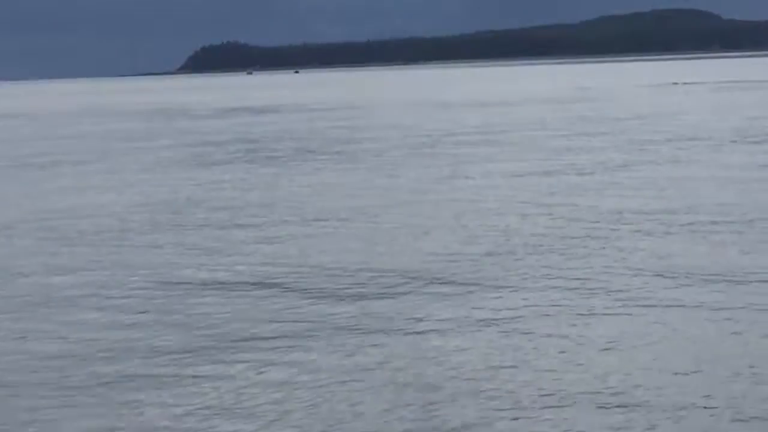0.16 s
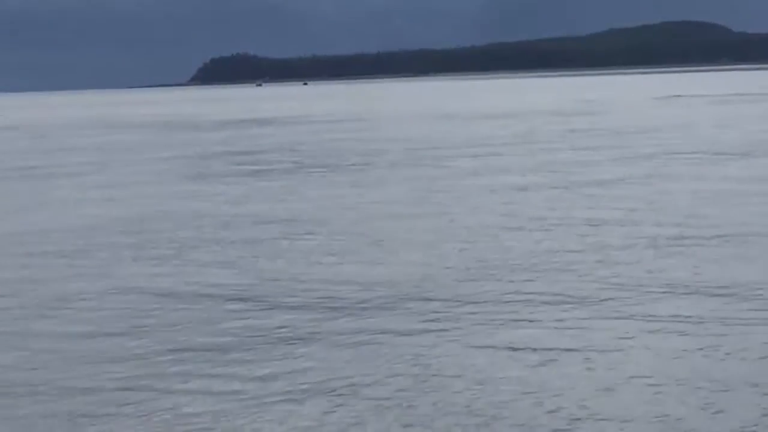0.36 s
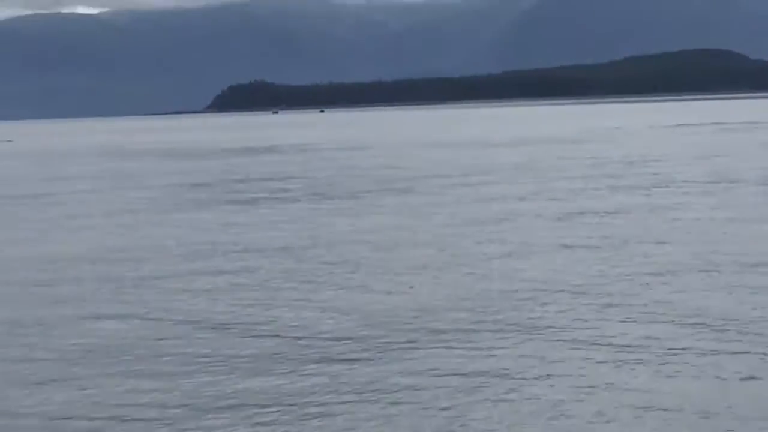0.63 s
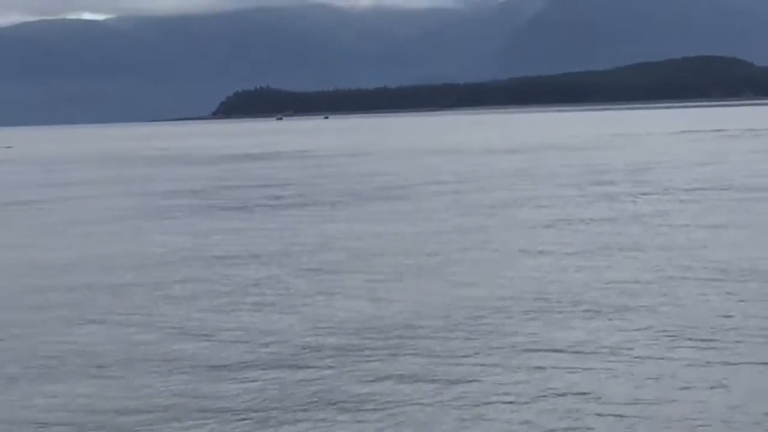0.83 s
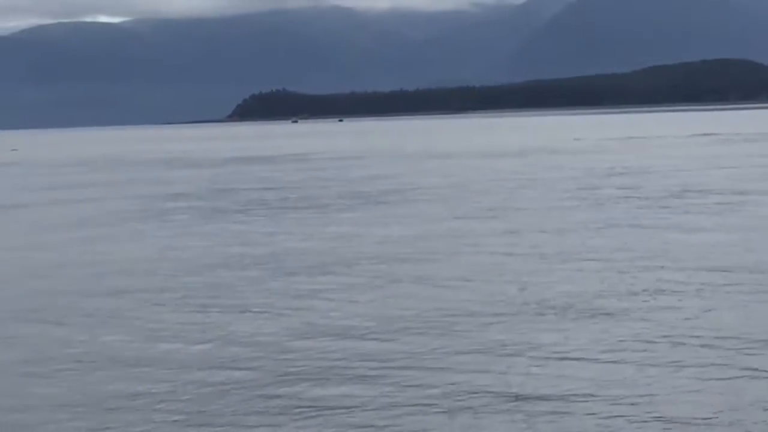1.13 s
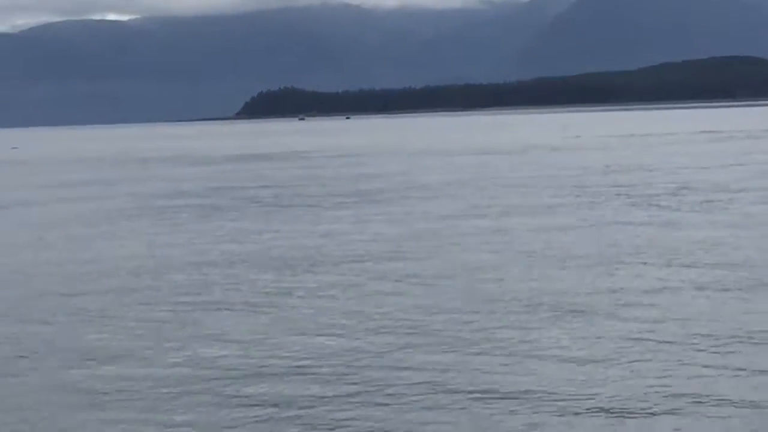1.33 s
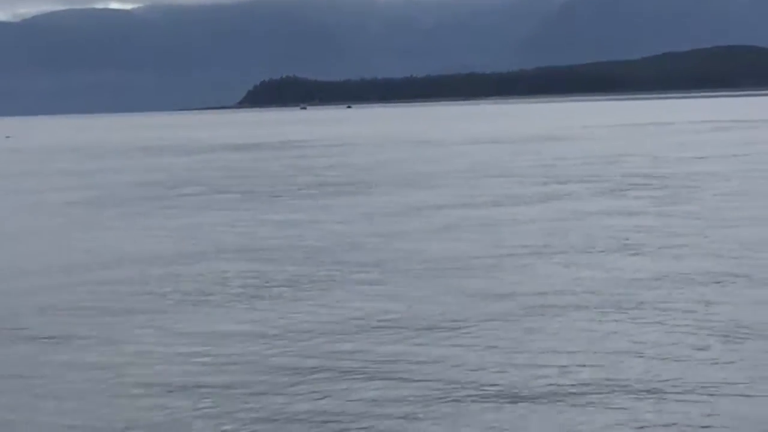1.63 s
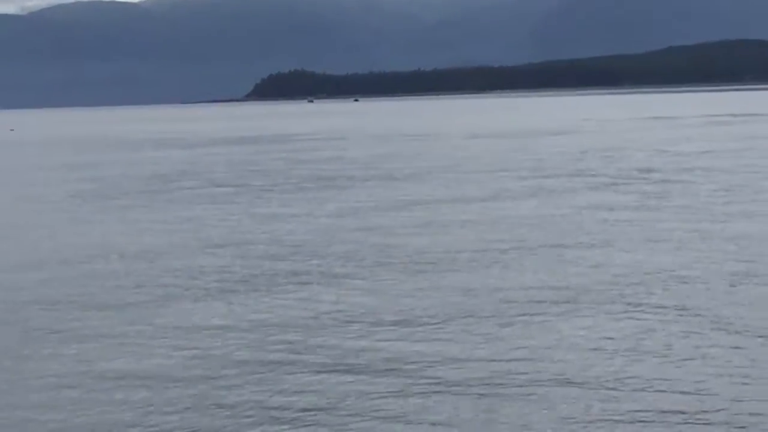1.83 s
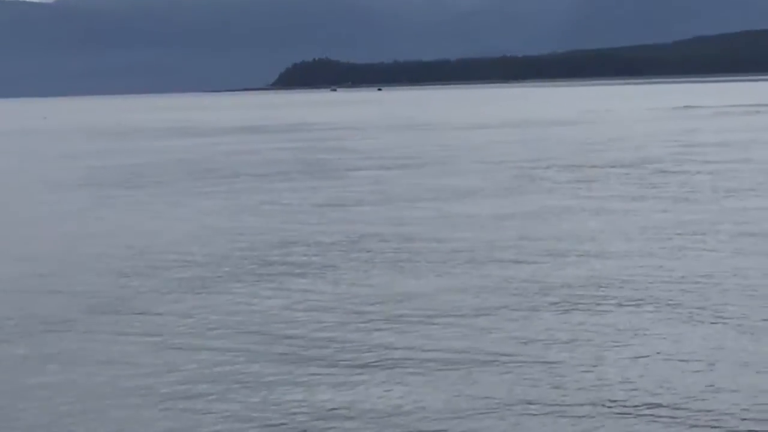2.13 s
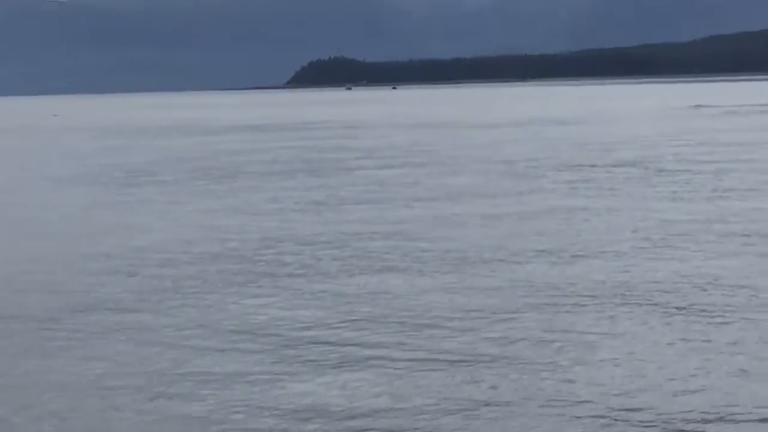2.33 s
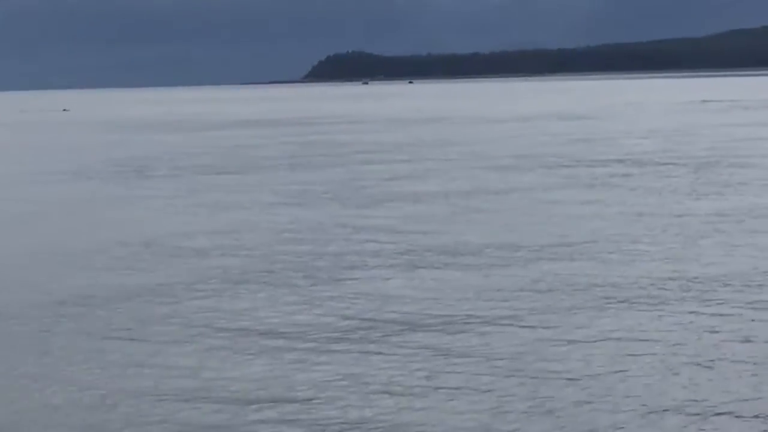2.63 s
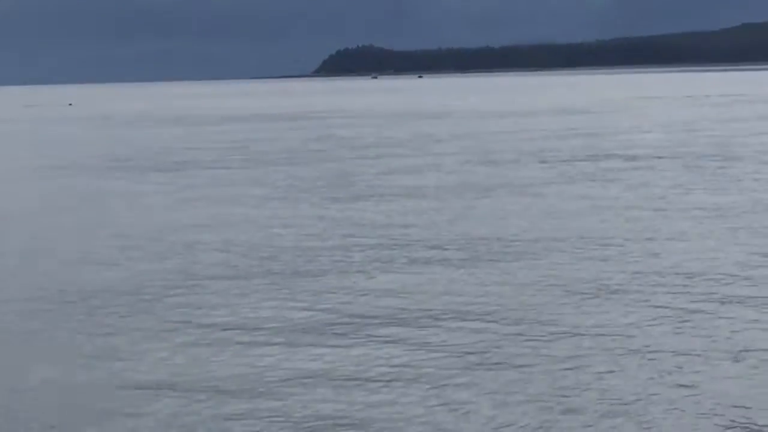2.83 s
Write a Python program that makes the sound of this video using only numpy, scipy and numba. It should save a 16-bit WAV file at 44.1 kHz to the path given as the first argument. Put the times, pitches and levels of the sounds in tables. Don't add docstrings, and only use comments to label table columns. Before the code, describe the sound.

Deep steady putter of an idling boat motor, wet exhaust gurgling, faint water laps and plinks

```python
import sys
import numpy as np
from scipy import signal
from scipy.fft import rfft, irfft
from scipy.io import wavfile
from scipy.ndimage import uniform_filter1d
from numba import njit

SR = 44100
rng = np.random.default_rng(int(sys.argv[2]) if len(sys.argv) > 2 else 0)


def makeup_ratio(level_db):
    decades = np.asarray(level_db, float) / 20
    return 10 ** decades


def to_wav(s):
    ch = np.atleast_2d(s).T
    pcm = np.round(np.clip(ch, -1, 1) * 32767)
    wavfile.write(sys.argv[1], SR, pcm.astype(np.int16))


N = 131418
THUMP_TURN = .1


def level(x, db):
    return x * makeup_ratio(db) / np.sqrt(np.mean(x ** 2))


@njit
def svf(x, hz, width_hz):
    y, band, low = np.empty(len(x)), 0., 0.
    g, k = np.tan(np.pi * hz / SR), width_hz / hz
    for i in range(len(x)):
        v = (band + g * (x[i] - low)) / (1 + g * (g + k))
        band, low, y[i] = 2 * v - band, low + 2 * g * v, k * v
    return y


def curve(table):
    t_s, value = np.array(table, float).T
    return np.interp(np.arange(N) / SR, t_s, value)


def walk(rate_hz):
    hold = int(SR / rate_hz)
    steps = np.repeat(rng.standard_normal(N // hold + 1), hold)
    return 0.56 * uniform_filter1d(uniform_filter1d(steps, hold), hold)[:N]


def plinks(rows, cycles, glide):
    out = np.zeros(N + SR)
    for t_s, db, hz in rows:
        turns = np.arange(int(5 * cycles / hz * SR)) * hz / SR
        shape = (1 - np.exp(-2 * turns)) * np.exp(-turns / cycles)
        tone = np.sin(2 * np.pi * turns * (1 + glide * turns / cycles))
        at = int(t_s * SR)
        out[at:at + len(turns)] += makeup_ratio(db) * shape * tone
    return out[:N]


def burst(noise, t_s, db, length_s, hz, width):
    hz = float(hz)
    band = svf(svf(noise, hz, width * hz), hz, width * hz)
    return level(band, db) * np.exp(-((np.arange(N) / SR - t_s) / length_s) ** 2)


def hum(turn):
    # t/s, level/dB
    hum_level = [(0, -30), (.6, -30.5), (.8, -34.5), (1.15, -32.5), (1.3, -29), (1.6, -30.5), (1.9, -30.5),
                 (2.05, -30), (2.98, -29.5)]
    overtone_db = -16
    tone = np.cos(8 * np.pi * turn) + makeup_ratio(overtone_db) * np.cos(16 * np.pi * turn)
    return np.sqrt(2) * makeup_ratio(curve(hum_level) + 0.18 * walk(12.0)) * tone


def thumps(turn):
    # t/s, thump level/dB
    load = [(0, -17), (.15, -20), (.22, -25.5), (.33, -21.5), (.7, -19.5), (.85, -25), (1.15, -18.5),
            (1.35, -22), (1.7, -19), (1.9, -21), (2.05, -16), (2.17, -21.5), (2.25, -19.5), (2.98, -21)]
    thump_hz, scatter_db, jitter_turn, pitch_scatter = 105, 1.0, .005, .015
    count = np.arange(int(turn[-1]) + 1)
    chance = rng.standard_normal((len(count), 3))
    at_s = np.interp(count + THUMP_TURN + jitter_turn * chance[:, 0], turn, np.arange(N) / SR)
    peak_db = np.interp(at_s, *np.array(load).T) + scatter_db * chance[:, 1]
    pitch_hz = thump_hz * (1 + pitch_scatter * chance[:, 2])
    return plinks(zip(at_s, peak_db, pitch_hz), cycles=2.5, glide=-.14)


def gurgle(turn):
    # f/Hz, width/Hz, level/dB
    exhaust = [(93, 38, -3.5), (123, 11.6, 4.5), (177, 16.2, -0.5), (188, 9.1, -20.5), (316, 176, -14.5)]
    decay_turns, hull_cut_hz, gurgle_db = 2.5, 88, -38
    pulse = np.exp(-((turn - THUMP_TURN) % 1) / decay_turns)
    gas = rng.standard_normal(N) * pulse * makeup_ratio(4.8 * walk(10))
    rung = sum(makeup_ratio(db) * svf(gas, float(hz), float(width_hz)) for hz, width_hz, db in exhaust)
    hull = signal.butter(4, hull_cut_hz, "highpass", fs=SR, output="sos")
    return level(signal.sosfilt(hull, svf(rung, 105.0, 185.0)), gurgle_db)


def engine():
    # t/s, cycle rate/Hz
    speed = [(0, 15.65), (.45, 15.5), (.75, 15.55), (.9, 14.95), (1.2, 15.1), (1.5, 15.16), (2, 15.12),
             (2.3, 15.04)]
    start_turn = .108
    turn = start_turn + np.cumsum(curve(speed)) / SR
    return hum(turn) + thumps(turn) + gurgle(turn)


def wash(surge_db):
    # f/Hz, density/dB per Hz, band change/dB per dB of surge
    spectrum = [(31.2, 3, 1), (265, 1, 0.22), (526, -20, 2.35), (830, -14, 1.5), (2230, -19, 1.49),
                (7400, -44, 2.5), (9100, -41.5, 1), (15900, -40, 2.5)]
    wash_db = -30.5
    hz, density_db, follow_db = np.array(spectrum).T
    shared, spray = walk(11.9), walk(120)
    spray = spray - uniform_filter1d(spray, size=2000)
    bins_oct = np.log2(np.arange(1, N // 2 + 2) * SR / N)
    noise = rfft(rng.standard_normal(N)) * makeup_ratio(np.interp(bins_oct, np.log2(hz), density_db))
    out = 0
    for octave in np.arange(4.5, 14.6, .5):
        share = np.cos(np.pi * np.clip(bins_oct - octave, -.5, .5)) ** 2
        follow = np.interp(octave, np.log2(hz), follow_db)
        swell_db = follow * (surge_db + 0.55 * shared + 0.65 * follow * spray)
        out = out + irfft(noise * share, N) * makeup_ratio(swell_db + 0.43 * walk(30))
    return out * makeup_ratio(wash_db)


def bubbles(surge_db):
    bubbles_db = -59
    chance = rng.random((900, 3))
    rows = [(3 * t, 14 * strength - 4.0 * pitch, 500 * 2 ** (2.52 * pitch)) for t, strength, pitch in chance]
    return level(plinks(rows, 2.96, 0.02), bubbles_db) * makeup_ratio(0.3 * surge_db)


def water():
    # t/s, wash level/dB
    wash_level = [(0, -58.5), (.07, -57.5), (.1, -58.5), (.2, -58.5), (.33, -55), (.53, -53), (.58, -54),
                  (.66, -56.5), (.86, -61), (1.45, -59.5), (1.58, -58), (1.76, -58.5), (1.8, -60),
                  (2.12, -60.5), (2.2, -58), (2.55, -60), (2.8, -62), (2.98, -60)]
    rest_db = -61
    surge_db = curve(wash_level) - rest_db
    return wash(surge_db) + bubbles(surge_db)


def puffs():
    # t/s, level/dB, length/s, centre f/Hz
    puff_rows = [(.04, -72, .03, 10000), (2.41, -70, .022, 5500), (1.022, -50, .015, 500),
                 (2.22, -57, .035, 1200), (.68, -60, .04, 2000), (2.38, -46, .04, 160),
                 (2.82, -46, .05, 170), (.33, -70, .04, 13000), (.738, -48, .01, 560),
                 (.75, -49, .012, 400), (.79, -52, .012, 500), (.775, -53, .012, 1200),
                 (1.725, -48, .015, 430), (2.125, -52, .03, 520), (2.86, -49, .025, 480),
                 (2.56, -51, .02, 400), (.36, -50, .04, 370), (.63, -50, .02, 370), (.83, -51, .02, 370),
                 (.69, -70, .045, 13500), (.45, -67, .08, 13500), (1.65, -75, .06, 13500),
                 (2.38, -72, .06, 14000), (1.24, -58, .03, 1100), (.4, -45, .06, 150), (2.0, -46, .08, 150),
                 (1.66, -64, .08, 3800)]
    noise = rng.standard_normal(N)
    return sum(burst(noise, *row, width=.7) for row in puff_rows)


def slaps():
    # t/s, peak/dB, f/Hz
    slap_rows = [(.765, -27.5, 316), (1.715, -32.5, 326), (2.44, -29.5, 203), (2.885, -35, 344),
                 (.38, -25.5, 157), (1.037, -32, 204), (1.36, -21, 165), (1.77, -51, 177), (1.97, -40, 186),
                 (2.56, -23.5, 180), (.185, -32.5, 200), (.454, -26, 201), (.579, -34, 175),
                 (.748, -35, 168), (.857, -37, 181), (.949, -36, 200), (1.203, -29, 207), (1.26, -33, 212),
                 (1.688, -37, 161), (1.93, -39, 282), (2.22, -33.5, 290), (2.313, -28, 173),
                 (2.626, -30.5, 260), (2.751, -32.5, 349)]
    return plinks(slap_rows, cycles=2.5, glide=0.015)


def drops():
    # t/s, peak/dB, f/Hz
    drop_rows = [
        (0.3052, -26, 1690),
        (0.7754, -26, 1630),
        (2.0572, -58, 1100),
        (2.2445, -36.5, 1010),
        (2.527, -24.5, 2000),
        (2.5626, -40, 1210),
        (2.591, -51, 1010),
        (2.8903, -30, 1140),
        (2.9362, -57.5, 1040),
    ]
    return makeup_ratio(-15.5) * plinks(drop_rows, cycles=5.4, glide=0.02)


def ticks():
    # t/s, level/dB, centre f/Hz
    tick_rows = [(2.165, -64, 9000), (2.165, -62, 13500), (2.207, -64, 10000), (2.203, -63, 5000),
                 (.91, -71, 13000), (1.099, -66, 4200), (1.652, -70, 12500), (1.768, -70, 11000),
                 (2, -69, 4100), (2.061, -59, 3500), (2.345, -74.5, 13000), (2.523, -72, 9000),
                 (2.625, -74.5, 13000), (2.725, -71, 13000), (2.937, -77, 4300), (2.937, -77, 14000),
                 (.959, -62, 1500)]
    noise, length_s = rng.standard_normal(N), .0013
    return sum(burst(noise, t_s, db, length_s, hz, width=.7) for t_s, db, hz in tick_rows)


def scene():
    return (engine() + water() + puffs() + slaps() + drops() + ticks())[None]


def low_pass(x):
    return signal.sosfilt(signal.butter(12, 16070, fs=SR, output="sos"), x)


def record(dry):
    bass_cut_hz, top_hz, hiss_db = 47, 15280, -84.5
    port_hz, port_width_hz, port_depth = 7750., 700., .4
    bass = signal.butter(3, bass_cut_hz, "highpass", fs=SR, output="sos")
    top = signal.ellip(14, .2, 70, top_hz, fs=SR, output="sos")
    hiss = level(svf(rng.standard_normal(N), 14000.0, 11600.0), hiss_db)
    dipped = dry - port_depth * svf(dry[0], port_hz, port_width_hz)
    mix = signal.sosfilt(top, signal.sosfiltfilt(bass, dipped) + hiss)
    return low_pass(mix)


dry = scene()
out = record(dry)
to_wav(out)
```